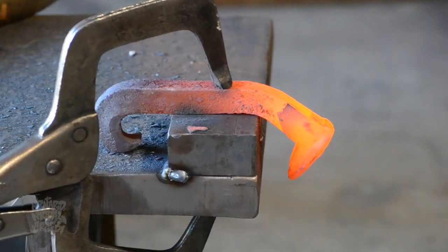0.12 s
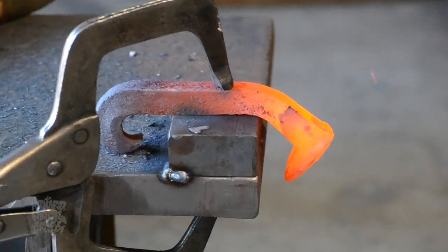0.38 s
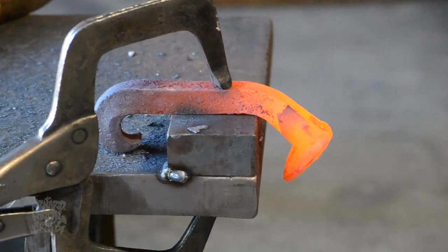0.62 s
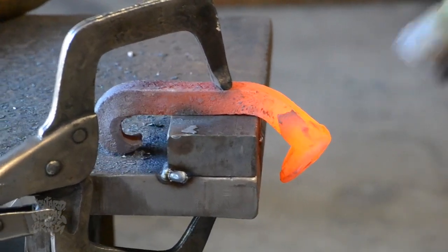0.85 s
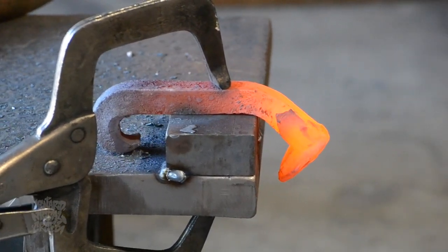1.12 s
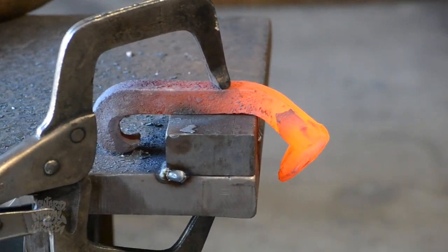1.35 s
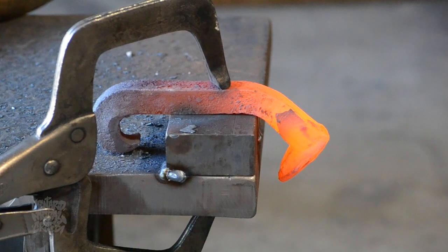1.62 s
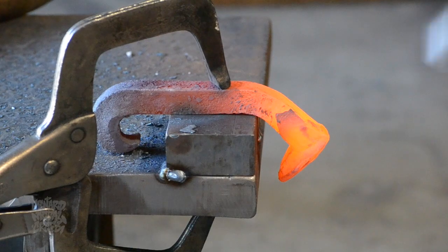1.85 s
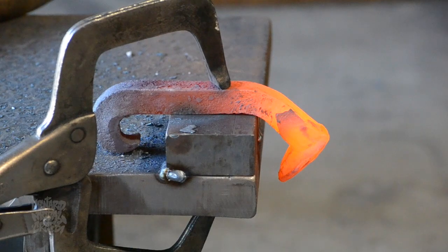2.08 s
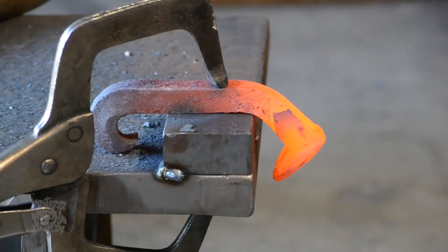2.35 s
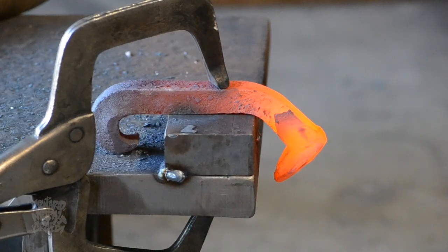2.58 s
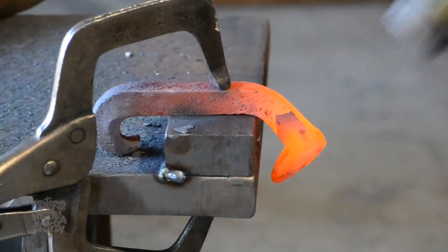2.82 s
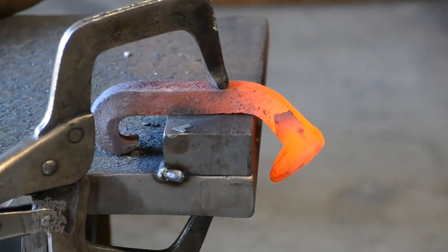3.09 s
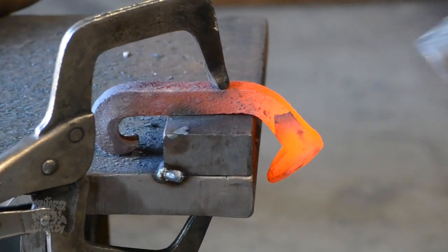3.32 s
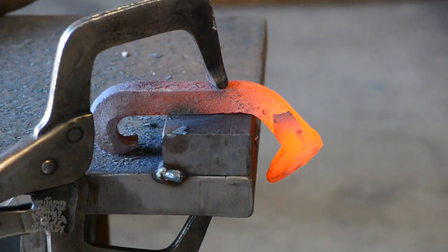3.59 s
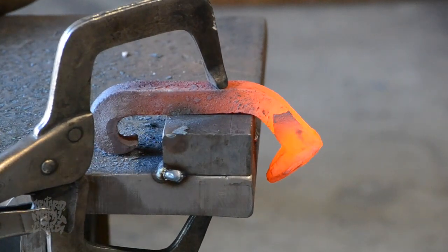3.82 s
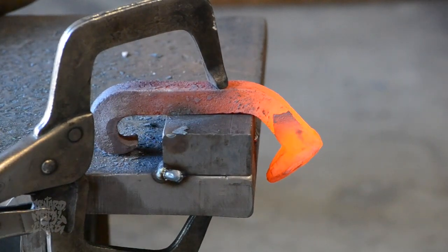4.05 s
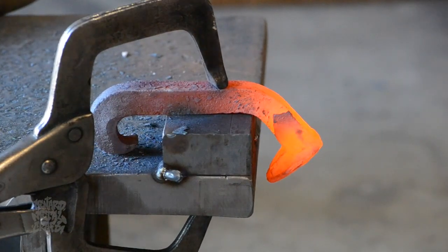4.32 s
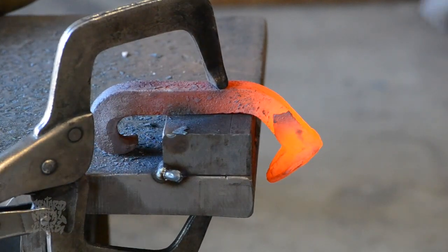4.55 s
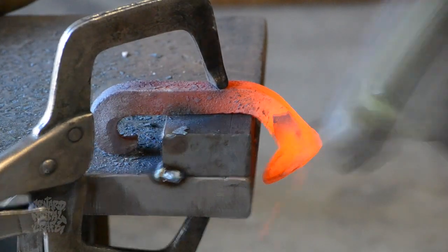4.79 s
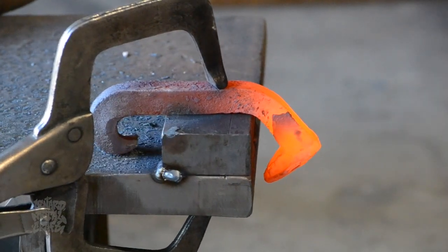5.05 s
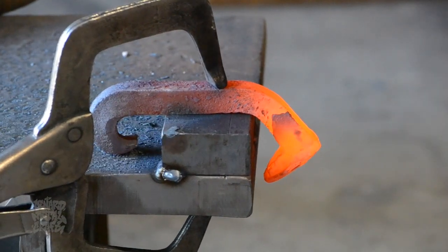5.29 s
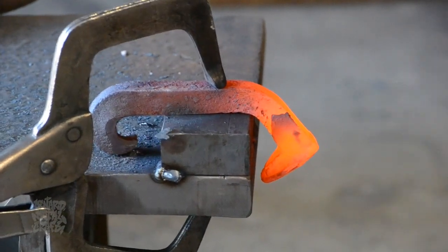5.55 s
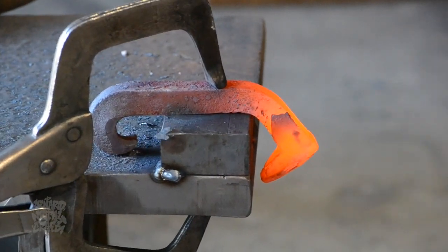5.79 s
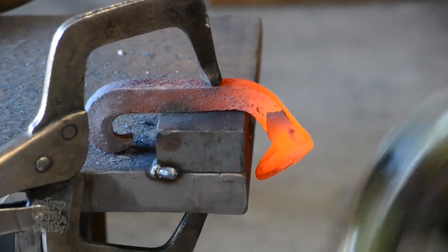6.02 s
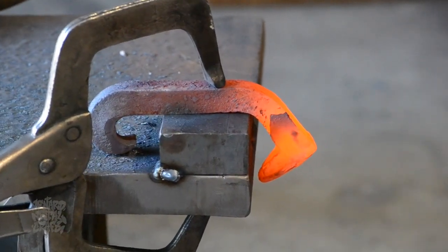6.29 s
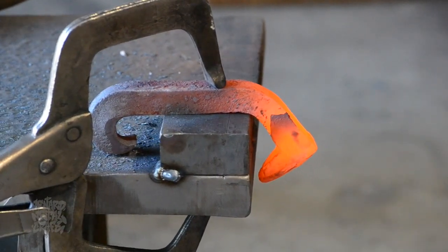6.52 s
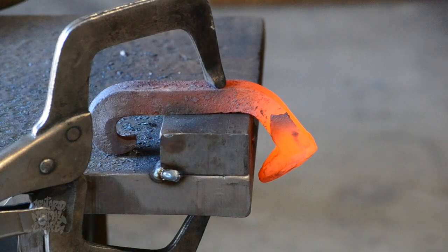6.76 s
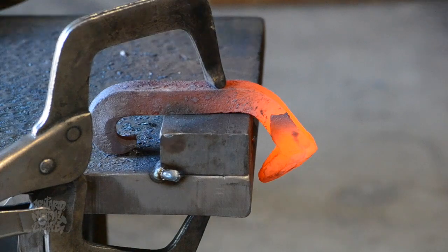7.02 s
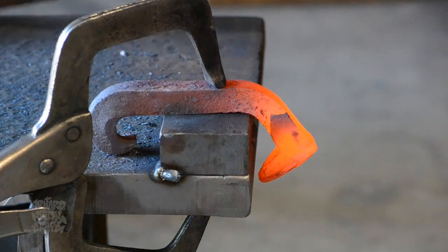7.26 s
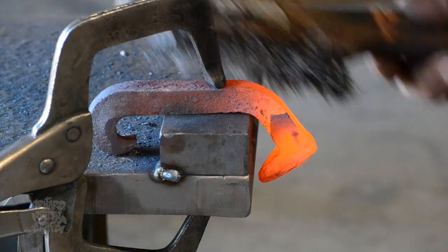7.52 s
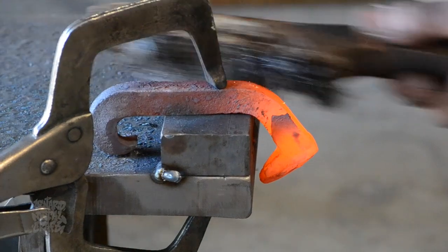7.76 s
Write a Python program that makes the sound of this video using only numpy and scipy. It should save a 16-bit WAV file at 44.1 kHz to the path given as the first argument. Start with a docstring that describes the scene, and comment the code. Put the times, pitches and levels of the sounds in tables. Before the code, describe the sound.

Ringing hammer blows on hot steel clamped to a steel block, in spaced groups, then dull bench knocks and wire brush scrapes over soft forge roar.

```python
"""A hammer bends hot steel clamped on a ringing steel block, in three sets of three blows in a workshop.
The first blow falls just before the start. Each blow is a crack of noise plus many dying sine tones, and
the recorder's gain control ducks it, so the long ring swells afterwards. The hammer is then laid down and
rocks on a bench: runs of short dull tones and a thin steel ring. A wire brush is picked up and starts to
scrub: dense random flicks. Small dry ticks fall in between, and the forge roars softly throughout as noise."""
import sys
import numpy as np
from scipy import signal
from scipy.fft import rfft, irfft, next_fast_len
from scipy.io import wavfile
from scipy.ndimage import uniform_filter1d

SR = 44100
rng = np.random.default_rng(int(sys.argv[2]) if len(sys.argv) > 2 else 0)


def rack_gain(trim_db):
    """Turn a fader trim in dB into the linear factor to multiply a signal by."""
    fader = np.asarray(trim_db, float)
    return 10 ** (fader / 20)


def wrap_up_sound(samples):
    """Save the sound to the file named by the first command line argument, as 16-bit audio."""
    columns = np.atleast_2d(samples).T
    # keep every value between -1 and 1, then stretch to whole-number steps
    tamed = np.clip(columns, -1, 1)
    steps = np.round(tamed * 32767).astype(np.int16)
    wavfile.write(sys.argv[1], SR, steps)


N = 347508
LEAD = next_fast_len(N + SR // 5) - N   # samples before the start, in which the first blow falls
SECONDS = (np.arange(N + LEAD) - LEAD) / SR   # time of every sample, zero at the start


def rms_one(x):
    """Scale to an rms (average strength) of 1."""
    return x / np.sqrt(np.mean(x ** 2) + 1e-20)


def colour(x, spectrum):
    """Shape by a spectrum with a causal (minimum phase) filter; white noise comes out with rms 1."""
    table_hz, table_db = np.transpose(spectrum)
    hz = np.maximum(np.fft.rfftfreq(len(x), 1 / SR), 1)
    db = np.interp(np.log(hz), np.log(table_hz), table_db)
    cepstrum = irfft(np.log(rms_one(rack_gain(db))), len(x))
    # folding the second half onto the first makes the filter act only after its input
    cepstrum[1:len(x) // 2] *= 2
    cepstrum[len(x) // 2:] = 0
    return irfft(rfft(x) * np.exp(rfft(cepstrum)), len(x))


def clicks(times, db):
    """Single samples at the given moments, counted from the end of the lead-in."""
    out = np.zeros(N + LEAD)
    out[(np.asarray(times) * SR).astype(int) + LEAD] = rack_gain(db)
    return out


def ring(x, hz, t60):
    """A unit click sets a sine of height 1 ringing; t60 is the time [s] it takes to fall by 60 dB."""
    r, w = rack_gain(-60 / (t60 * SR)), 2 * np.pi * hz / SR
    return signal.lfilter([0, np.sin(w)], [1, -2 * r * np.cos(w), r * r], x + 1e-18)


def dying(x, tau_s):
    """Each click becomes an envelope that dies away to 37 % in tau_s."""
    return signal.lfilter([1], [1, -np.exp(-1 / (tau_s * SR))], x + 1e-18)


def drift(rate):
    """Slow random wandering with spread 1; a higher rate wanders faster."""
    knots_per_s = 100
    knots = rng.standard_normal(int((N + LEAD) / SR * knots_per_s) + 2)
    slow = rms_one(uniform_filter1d(knots, size=max(int(50 / rate), 1)))
    return np.interp(np.arange(N + LEAD) / SR * knots_per_s, np.arange(len(slow)), slow)


# how much more each blow's spot excites the four singing modes:
# (time [s], first mode [dB], second [dB], third [dB], fourth [dB])
BLOW_TABLE = [(-0.13, 8, -3, -12, -5.5), (0.3371, -3, -1.5, -11, -1), (0.8105, 4, 0, -4.5, -5.5),
              (2.2518, -18, -3, -0.5, 0.5), (2.7706, 5, 1.5, -1.5, -3.5), (3.2643, -2, 0, 2, -4),
              (4.8801, 0.5, -5, -0.5, 1.5), (5.412, -9.5, 1.5, 1, -10), (6.061, 1, 2.5, -1.5, 1.5)]
# pitches of those four singing modes: (frequency [Hz])
SINGING_MODES = [836, 927, 1314, 4952]
# modes whose strength goes with, or against, a singing mode: (frequency [Hz], singing frequency [Hz], share)
LINKED_MODES = [(1679, 1314, -.9), (1952, 4952, .8), (2000, 4952, .5), (2400, 4952, .7), (2556, 4952, .7),
                (3981, 4952, .4), (5877, 4952, .4)]


def spot_levels(hz, t60, singing_db, chance, kin_spread_db=1.5, spread_db=2.5):
    """Where the hammer lands decides how strongly each blow excites a mode."""
    near = np.abs(np.array(SINGING_MODES) / hz - 1) < .02
    if near.any():
        # only the shorter singing modes also vary by chance
        return singing_db[np.argmax(near)] + kin_spread_db * chance * (t60 < 1)
    for linked_hz, leader_hz, share in LINKED_MODES:
        if linked_hz == hz:
            leader_db = singing_db[SINGING_MODES.index(leader_hz)]
            return share * (leader_db - np.mean(leader_db)) + kin_spread_db * chance
    return spread_db * chance


def waver(mode, hz, t60, rough_s=.3, per_s=14):
    """A mode's own echoes make its level and phase waver, the more the shorter it rings."""
    echoes = min(rough_s / t60, 1)
    quarter = round(SR / hz / 4)
    late = np.pad(mode, (quarter, 0))[:len(mode)]   # a quarter cycle later
    mixed = mode * (1 + echoes * drift(per_s)) + late * echoes * drift(per_s)
    return mixed / np.sqrt(1 + 2 * echoes ** 2)


# pitches of the modes of block and clamp: (frequency [Hz])
BLOCK_PITCHES = [575, 770, 836, 927, 1035, 1005, 1307, 1320, 1679, 1952, 2000, 2080, 2103, 2257, 2342, 2400,
                 2556, 2794, 3427, 3553, 3767, 3981, 4451, 4791, 4952, 5410, 5877, 5992, 6756, 6844, 7074,
                 7197, 8177, 8629, 9722]
# the same modes, before each blow's spot and the clamp's grip: (level [dB], time to fall 60 dB [s])
BLOCK_RINGS = [(-4, 0.045), (-23, 0.74), (-11.5, 1.556), (-11, 1.676), (-12.5, 0.45), (-15.5, 0.44),
               (-8, .55), (-16.5, 0.4), (-25.5, 0.79), (-17.5, 0.52), (-6.5, 0.17), (-23, 0.61),
               (-18, 0.49), (-15, 0.42), (-15, 0.38), (-20.5, 0.4), (-17, 0.47), (-25, .4), (-28.5, 0.58),
               (-27.5, 0.29), (-14, 0.42), (-21.5, 0.36), (-23, 0.52), (-20, .36), (-8, 0.39), (-17, 0.4),
               (-13, 0.19), (-23, 0.15), (-21, 0.37), (-10.5, 0.12), (-22.5, .28), (-21.5, .28),
               (-20.5, 0.4), (-20.5, .28), (-23, .26)]
# extra damping of the block by the clamp in each set of three blows: (damping [dB per s])
CLAMP_GRIP = [4, -2.5, -2.5]


def anvil():
    """Every blow strikes all modes of the steel block, and each mode rings as a dying sine."""
    s, *singing_db = np.transpose(BLOW_TABLE)
    chance = rng.standard_normal((len(s), len(BLOCK_RINGS)))
    out = 0
    for k, (hz, (level_db, t60)) in enumerate(zip(BLOCK_PITCHES, BLOCK_RINGS)):
        spot_db = spot_levels(hz, t60, singing_db, chance[:, k])
        mode = ring(clicks(s, level_db + spot_db), hz, t60)
        if .15 < t60 < 1:
            mode = waver(mode, hz, t60)
        # short modes start upward or downward by chance
        out = out + mode * (np.sign(chance[0, k - 1]) if t60 < 1 else 1)
    # the grip acts afresh from each blow
    last = np.maximum(np.searchsorted(s, SECONDS) - 1, 0)
    grip_db_per_s = np.array(CLAMP_GRIP)[last // 3]
    return out * rack_gain(-grip_db_per_s * (SECONDS - s[last]))


# colour of the hammer face on steel: (frequency [Hz], relative level [dB per Hz])
CRACK_COLOUR = [(30, -74.5), (100, -52.5), (300, -20.5), (600, -3.5), (900, -5), (2070, -5.5), (3300, -10),
                (4800, -9.5), (6300, -7), (8000, -8), (9000, -6.5), (11000, -25.5), (13000, -44.5)]


def crack(level_db=4, tau_s=0.0052):
    """A few milliseconds of dense chatter where the face meets the steel."""
    s = np.array(BLOW_TABLE)[:, 0]
    chatter = rng.standard_normal(N + LEAD) * dying(clicks(s, level_db), tau_s)
    return colour(chatter, CRACK_COLOUR)


# how long the workshop's echoes last at each pitch: (frequency [Hz], time to fall 60 dB [s])
SHOP_ECHO = [(100, 0.081), (600, 0.52), (1500, 0.46), (3000, 0.5), (7000, 0.38), (11000, 0.2)]


def clang(level_db=-17.5, spread_db=4.0, count=80):
    """Clamp, jig and bolts: a crowd of lesser modes, coloured like the crack and dying like the room."""
    s = np.array(BLOW_TABLE)[:, 0]
    pitches = np.linspace(1500, 11000, count) * rng.uniform(.98, 1.02, count)
    chance = rng.standard_normal((len(s), count))
    lasting = rng.uniform(.5, .95, count)   # share of the room's echo time
    out = 0
    for k, hz in enumerate(pitches):
        level = level_db + np.interp(hz, *np.transpose(CRACK_COLOUR)) + spread_db * chance[:, k]
        t60 = lasting[k] * np.interp(hz, *np.transpose(SHOP_ECHO))
        out = out + (-1) ** k * ring(clicks(s, level), hz, t60)
    return out


# the hammer rocks on the bench, each rock a run of touches:
# (start [s], length [s], first relative level [dB], last relative level [dB], relative ring of the head [dB])
ROCK_TABLE = [(6.536, 0, -15.5, -18, -77), (6.5436, .026, -15.5, -30.5, -60), (6.652, .0085, -28, -31, -72),
              (6.682, 0.013, -26, -28, -75), (6.7365, .047, -24, -24, -79), (6.931, .039, -31, -28, -84),
              (7.075, 0.0057, -29.5, -32, -88), (7.216, 0, -38.5, -39.5, -85)]


def touches(spacing_s=.012, jitter_s=.001):
    """Every rock becomes about evenly spaced, slightly uneven touches: (s, dB, head dB)."""
    rows = []
    for s, length_s, first_db, last_db, head_db in ROCK_TABLE:
        along = np.linspace(0, 1, round(length_s / spacing_s) + 1)
        inner = (along > 0) * (along < 1)   # the first and last touch stay on time
        late_s = jitter_s * rng.standard_normal(len(along)) * inner
        db = first_db + (last_db - first_db) * along
        rows += zip(s + length_s * along + late_s, db, head_db + db - first_db)
    return np.transpose(rows)


# short modes of the bench: (frequency [Hz], relative level [dB], time to fall 60 dB [s])
BENCH_MODES = [(340, -26, .03), (510, -10, 0.013), (970, 0.5, 0.0039), (1582, -6.5, 0.014),
               (2070, -5, 0.0045), (2580, -13, 0.0021), (3370, -41, 0.0062), (4360, -39, 0.0045)]


def bench(s, db, level_db=6, spread_db=2.0, rebound_s=0.0037, rebound_db=-9.5):
    """Each contact, with a softer rebound just after, sets the short modes of the bench going."""
    chance = rng.standard_normal((len(s), len(BENCH_MODES)))
    wood = 0
    for k, (hz, mode_db, t60) in enumerate(BENCH_MODES):
        peak_db = db + level_db + mode_db + spread_db * chance[:, k]
        contacts = clicks(s, peak_db) + clicks(s + rebound_s, peak_db + rebound_db)
        wood = wood + (-1) ** k * ring(contacts, hz, t60)
    return signal.sosfilt(signal.butter(4, [250, 4200], "band", fs=SR, output="sos"), wood)


# modes of the hammer head: (frequency [Hz], relative level [dB], time to fall 60 dB [s])
HEAD_MODES = [(8550, -35, .15), (9370, -28, 0.074), (9450, -33, 0.3)]


def hammer_head(s, head_db, lag_s=.002, build_t60=0.014):
    """The steel head lands just after the handle and rings thinly, building over a few milliseconds."""
    out = 0
    for hz, mode_db, t60 in HEAD_MODES:
        push = ring(clicks(s + lag_s, head_db + mode_db), hz, build_t60)
        out = out + ring(push, hz, t60)
    return out


# the brush is lifted, set down and drawn twice:
# (time at full pressure [s], level [dB], swell [s per 20 dB], hold [s])
STROKE_TABLE = [(7.168, -61, .02, .02), (7.318, -64, .1, .005), (7.385, -71, .03, .2),
                (7.624, -56, .008, .003), (7.64, -68, .03, .07), (7.745, -51.5, .07, .035),
                (7.858, -46, .05, .03)]
# colour of the bristles: (frequency [Hz], relative level [dB per Hz])
BRISTLE_COLOUR = [(710, -31.5), (1200, -2), (1310, 6), (1620, -12.5), (2490, 1.5), (2990, -4), (3490, 1),
                  (4700, -8.5), (5750, -3), (6700, -7), (9200, -4), (10500, -23.5), (11900, -34),
                  (15500, -48), (22000, -120)]


def brush(grains_per_s=6000, fade_db_per_s=261):
    """Dense bristle flicks under strokes that swell, hold and fade."""
    strokes = 0
    for s, db, swell_s, hold_s in STROKE_TABLE:
        swell_db = 20 * (SECONDS - s) / max(swell_s, .003)
        fade_db = fade_db_per_s * (s + hold_s - SECONDS)
        strokes = strokes + rack_gain(db + np.clip(np.minimum(swell_db, fade_db), -100, 0))
    flicks = (rng.random(N + LEAD) < grains_per_s / SR) * rng.standard_normal(N + LEAD)
    return strokes * colour(rms_one(flicks), BRISTLE_COLOUR)


# small dry ticks of scale, clamp and bristles: (time [s], level [dB])
TICK_TABLE = [(1.3214, -51), (1.5863, -56), (1.697, -51.5), (2.61, -51.5), (5.3787, -45.5), (7.0544, -54.5),
              (7.1264, -47), (7.1666, -57), (7.2763, -53), (7.3026, -55), (7.3217, -57), (7.3857, -52),
              (7.624, -54)]
# small steel that ticks: (frequency [Hz], relative level [dB], time to fall 60 dB [s])
TICK_RINGS = [(3640, -12, 0.11), (5830, -15.5, .1), (6880, -22.5, .05), (8200, -21.5, 0.054),
              (8500, -20, 0.058)]


def ticks(tau_s=.0006, spread_db=4.0):
    """Lone ticks: a dry snap, and a faint ring of small steel, another mix each time."""
    s, db = np.transpose(TICK_TABLE)
    chance = rng.standard_normal((len(s), len(TICK_RINGS)))
    out = dying(clicks(s, db), tau_s) * colour(rng.standard_normal(N + LEAD), BRISTLE_COLOUR)
    for k, (hz, mode_db, t60) in enumerate(TICK_RINGS):
        out = out + ring(clicks(s, db + mode_db + spread_db * chance[:, k]), hz, t60)
    return out


def shop(x, level_db=-3.5):
    """Dense echoes of the walls: each band's energy lingers as noise and dies away at its own pace."""
    echo_hz, echo_t60 = np.transpose(SHOP_ECHO)
    edges = 160 * 2 ** np.arange(0, 6.5, 1 / 3)   # bands a third of an octave wide [Hz]
    white = rng.standard_normal((2, len(x)))      # neighbouring bands get unrelated noise
    out = 0
    for k, (low, high) in enumerate(zip(edges, edges[1:])):
        t60 = np.interp(np.log(low * high) / 2, np.log(echo_hz), echo_t60)
        band = signal.butter(2, [low, high], "band", fs=SR, output="sos")
        heard, noise = signal.sosfilt(band, [x, white[k % 2]])
        tau_s = t60 / np.log(1e6)   # energy falls a millionfold in 60 dB
        energy = dying(heard ** 2, tau_s) / (tau_s * SR)
        out = out + rms_one(noise) * np.sqrt(energy)
    return rack_gain(level_db) * out


# colour of the forge: (frequency [Hz], relative level [dB per Hz])
ROAR_COLOUR = [(15, -76), (25, -60), (148, -13), (192, -16), (322, -6), (499, -6), (613, -7), (774, -15.5),
               (836, -12), (951, -18.5), (1400, -25), (1720, -26), (2740, -39), (4470, -42.5),
               (11900, -58.5), (15500, -85.5), (22000, -120)]


def forge(level_db=-44.5, flutter_db=.6):
    """The burner's steady roar is coloured noise, fluttering a little."""
    return rack_gain(level_db + flutter_db * drift(8)) * colour(rng.standard_normal(N + LEAD), ROAR_COLOUR)


def scene():
    """Short sounds fill the room; the long steel modes outlast it. Small solid steel radiates no bass."""
    s, db, head_db = touches()
    short = crack() + bench(s, db) + brush() + ticks()
    no_bass = signal.butter(2, 350, "high", fs=SR, output="sos")
    steel = signal.sosfilt(no_bass, anvil() + clang())
    mix = steel + hammer_head(s, head_db) + short + shop(short) + forge()
    return mix[None, LEAD:]


def roll_off(x):
    """The treble ends steeply here."""
    return signal.sosfilt(signal.butter(12, 12080, fs=SR, output="sos"), x)


def record(dry):
    """Gain control drops just ahead of a blow and climbs back steadily; the microphone has a dip and cut ends."""
    duck_above_db, duck_share = -3, 0.78   # ducking is this share of the held level above the threshold
    held_fall_db_per_s, held_at_start_db = 72, 5
    attack_s, look_ahead_s = .003, .0013
    top = .48   # soft ceiling of the waveform
    # the held level jumps up with each peak and falls steadily in dB
    fall_db = held_fall_db_per_s * np.arange(N) / SR
    level_db = np.maximum(20 * np.log10(np.abs(dry[0]) + 1e-9), held_at_start_db - fall_db)
    held_db = np.maximum.accumulate(level_db + fall_db) - fall_db
    duck_db = duck_share * np.maximum(held_db - duck_above_db, 0)
    r = np.exp(-1 / (attack_s * SR))
    duck_db = signal.lfilter([1 - r], [1, -r], duck_db, zi=[r * duck_db[0]])[0]
    ahead = int(look_ahead_s * SR)
    duck_db = np.pad(duck_db, (0, ahead), "edge")[ahead:]
    x = top * np.tanh(dry * rack_gain(-duck_db) / top)
    # the dip halves the sound at 7950 Hz
    x = x - .5 * signal.lfilter(*signal.iirpeak(7950, 12.0, fs=SR), x)
    x = signal.sosfilt(signal.butter(2, 45, "high", fs=SR, output="sos"), x)
    x = signal.sosfilt(signal.cheby2(8, 40, 12400, fs=SR, output="sos"), x)   # 40 dB down from 12400 Hz up
    return roll_off(x)


dry = scene()
out = record(dry)
wrap_up_sound(out)
```